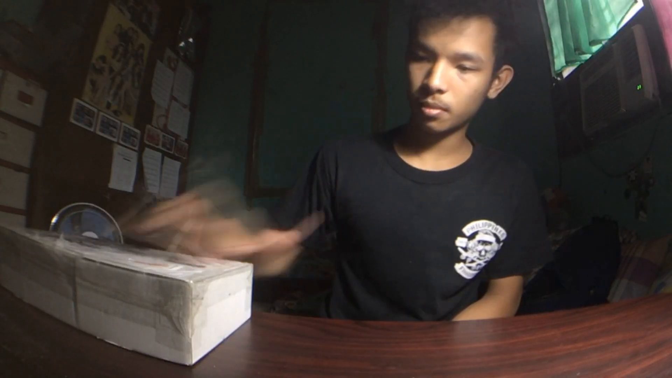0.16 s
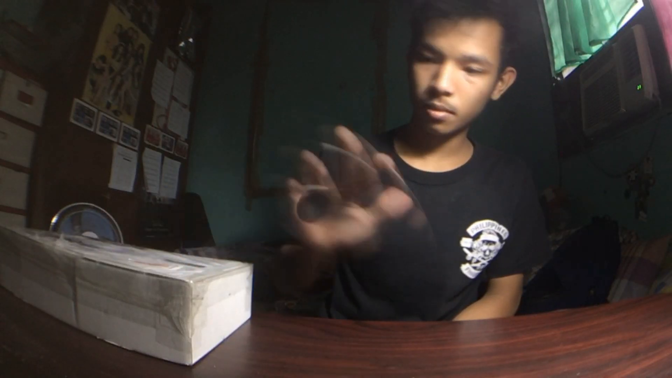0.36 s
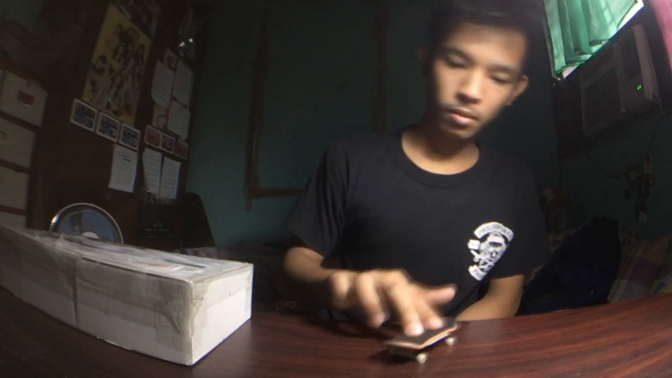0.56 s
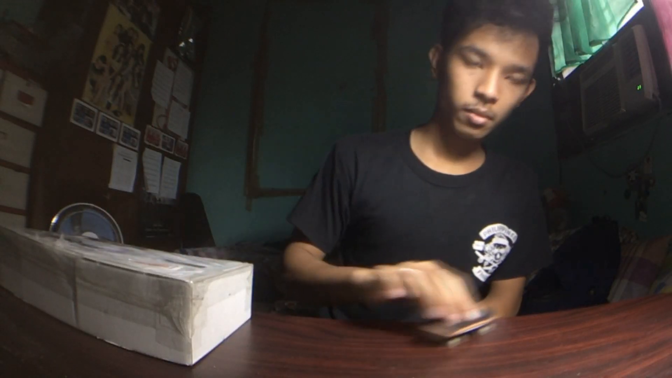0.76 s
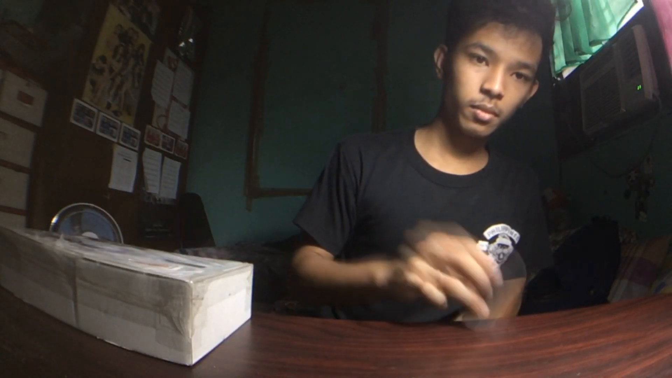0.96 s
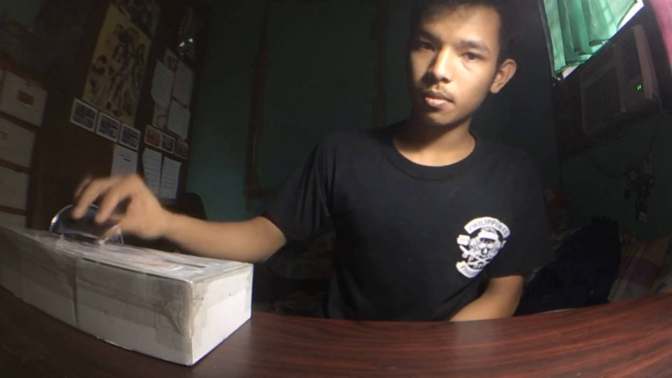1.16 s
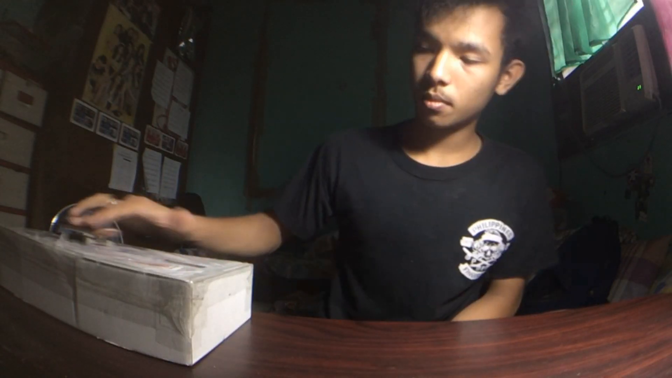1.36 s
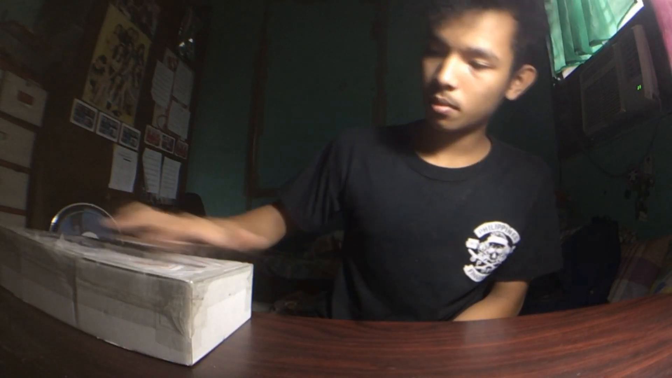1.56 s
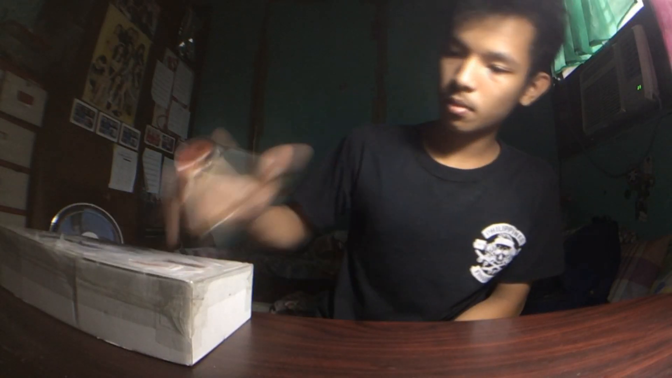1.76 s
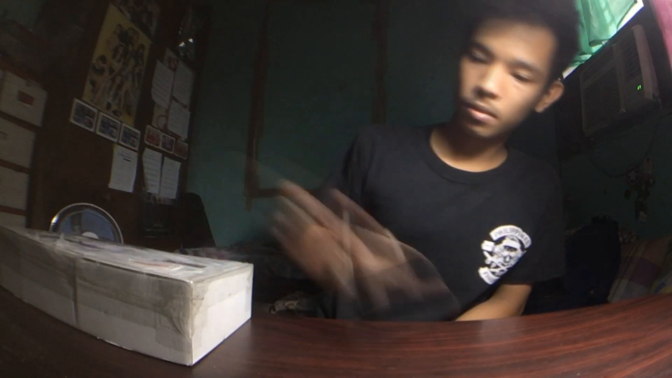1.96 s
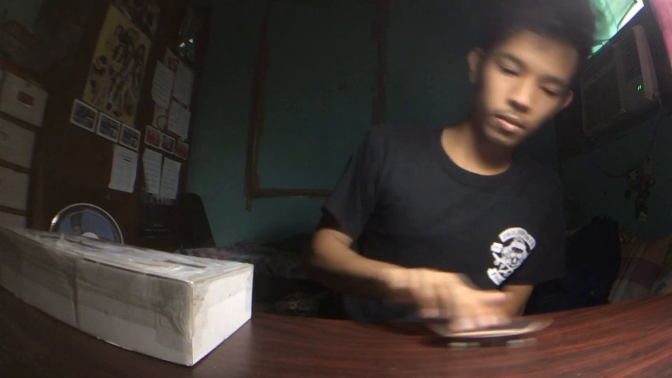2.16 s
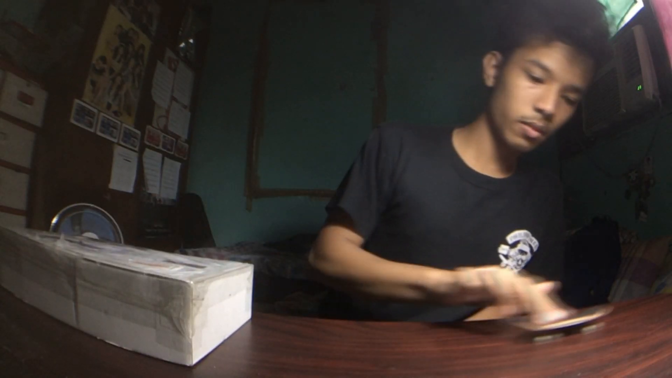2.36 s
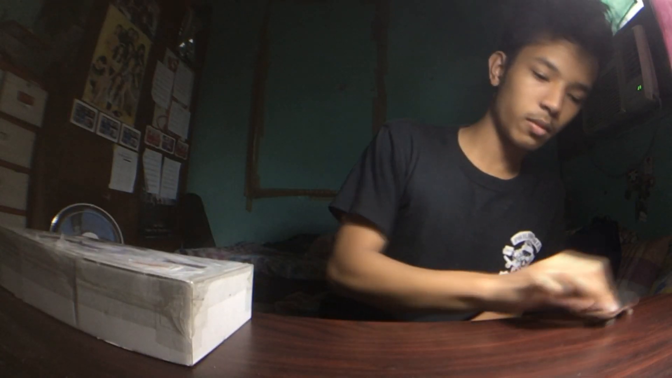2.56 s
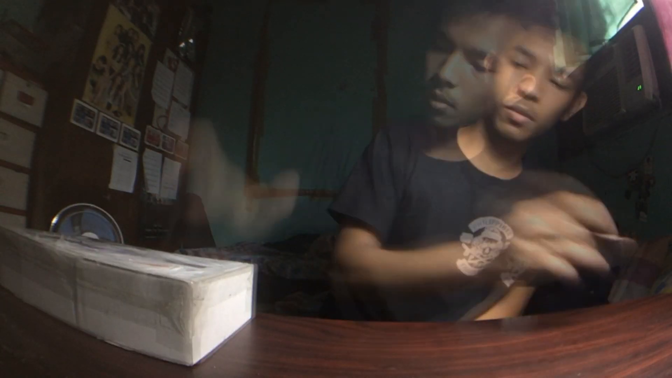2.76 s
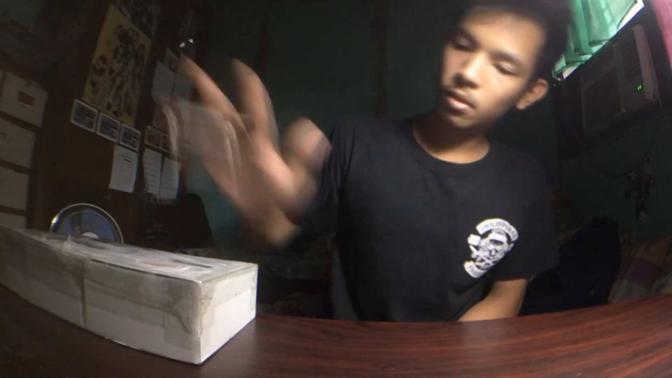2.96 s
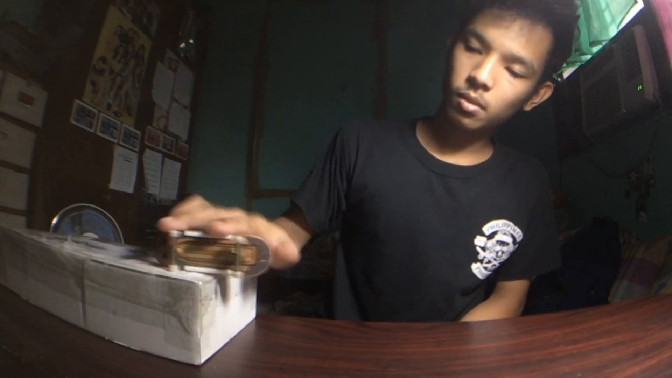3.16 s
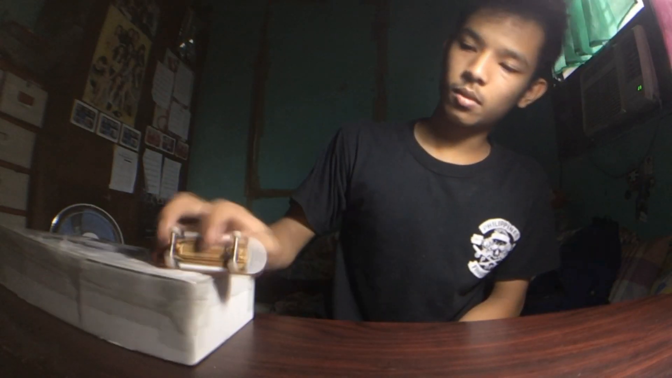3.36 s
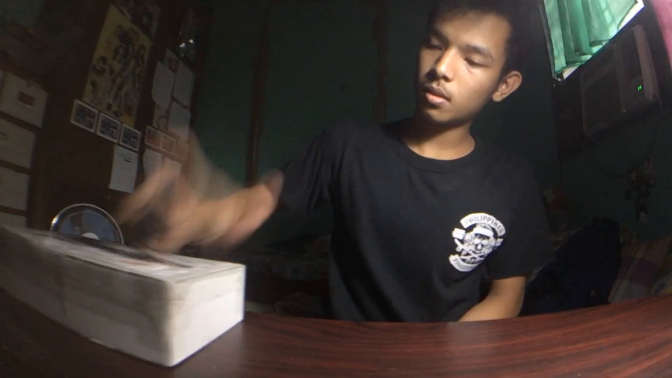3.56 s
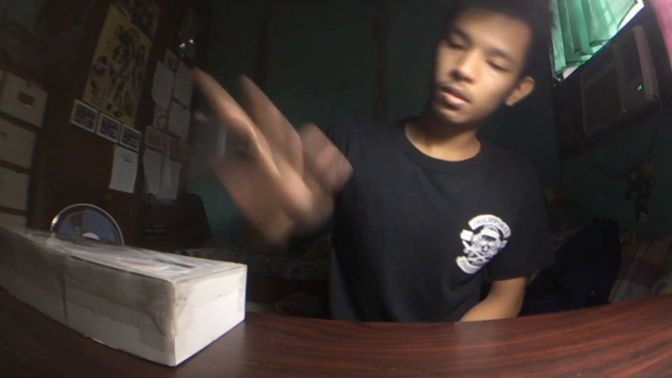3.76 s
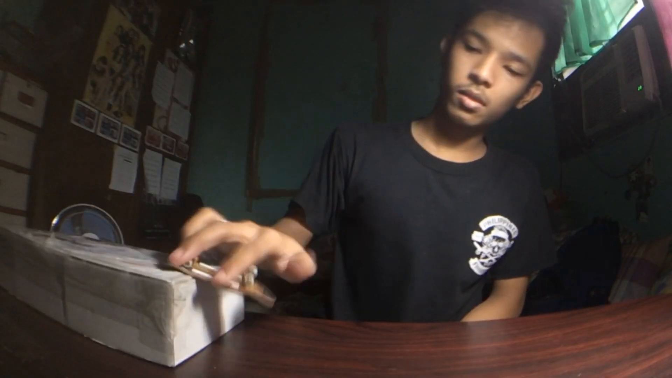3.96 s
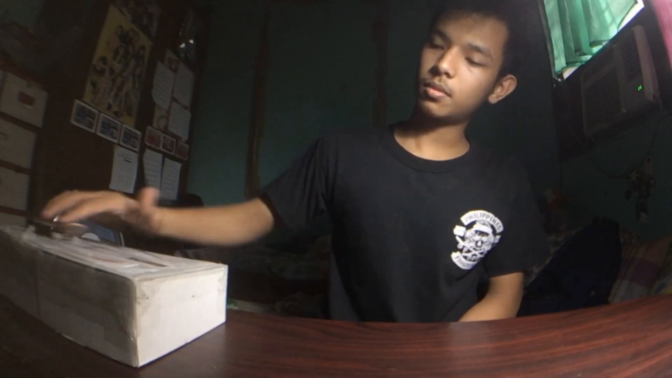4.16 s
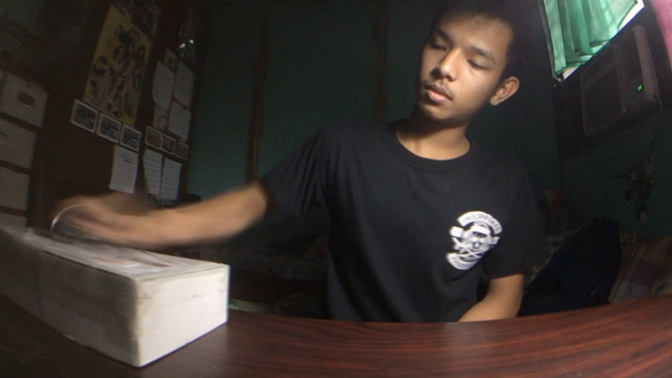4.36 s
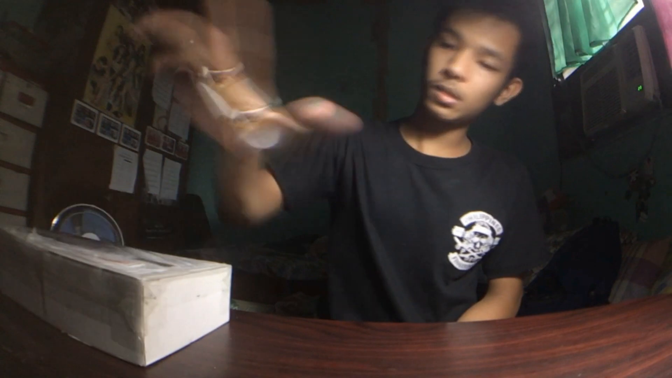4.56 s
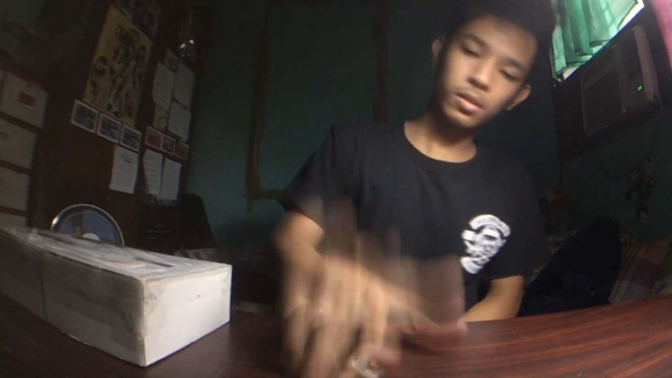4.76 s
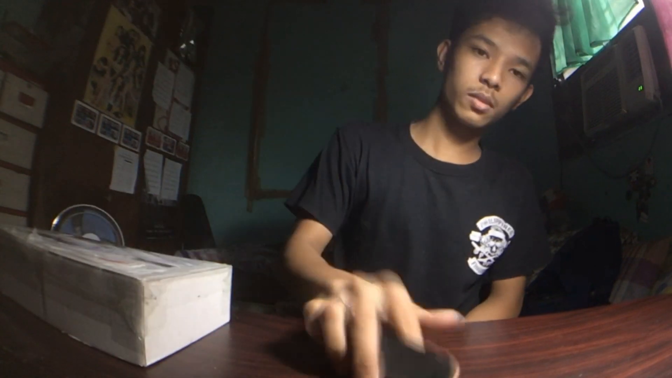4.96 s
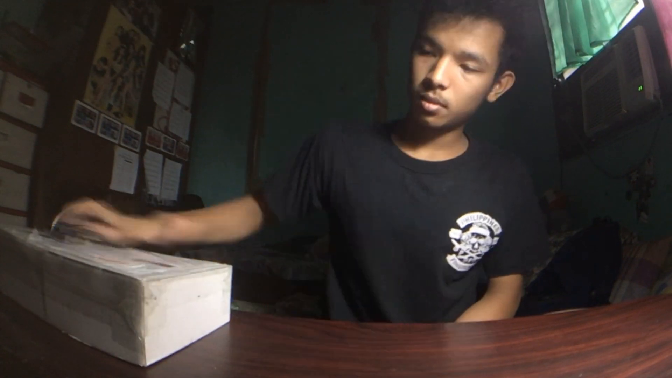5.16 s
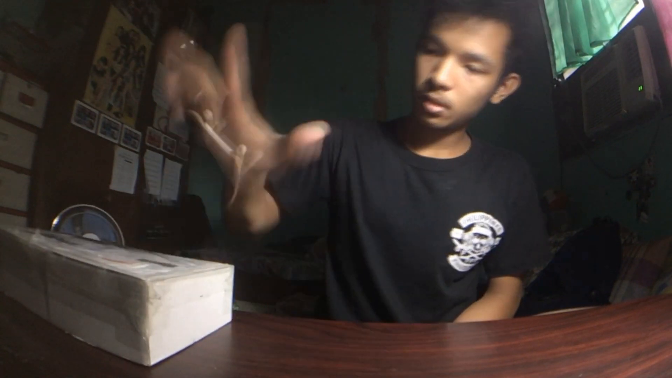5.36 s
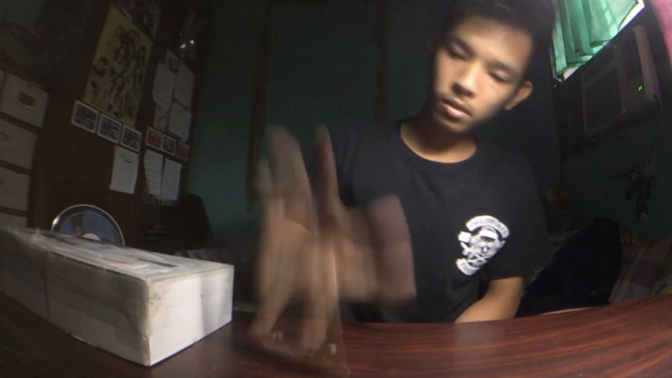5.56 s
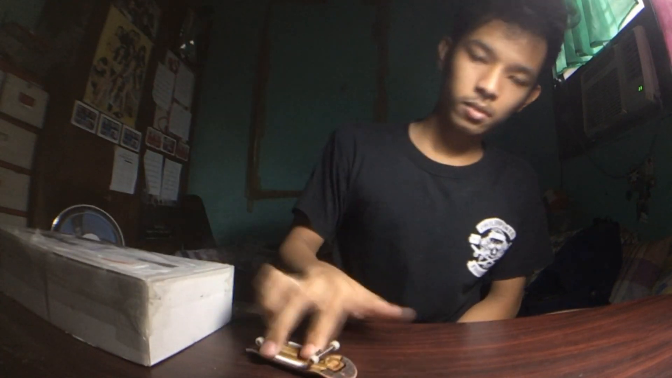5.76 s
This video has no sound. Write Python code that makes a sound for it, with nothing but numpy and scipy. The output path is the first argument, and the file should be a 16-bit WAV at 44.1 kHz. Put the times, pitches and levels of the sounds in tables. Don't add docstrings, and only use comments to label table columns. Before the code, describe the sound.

Indoors and close up, over low unsteady hum, hiss and street rumble, a fingerboard scrapes across a hollow cardboard box at 0.25 s, knocks at 0.3, then hits a wooden desk at 0.58-0.61 in very loud clustered clacks. Light rolling and ticks follow around 0.8-1.0; knocks come at 1.08 and 1.27-1.37. Wheels boom on cardboard at 1.63, a knock sounds at 1.84, and a hard double landing at 2.13-2.16 leads into rumbling wheels with regular axle ticks and a tiny squeak until 2.77. Box knocks cluster at 3.2. A short rising judder at 3.63 precedes box clatter at 3.96-4.09. Another, stronger judder at 4.5 leads to a desk smack at 4.9; the last at 5.33 leads to a clack at 5.73. From 4.24 a distant motorbike drones, dipping near 5.0. Blows clip and briefly duck the background; scene changes cause abrupt level jumps or dips, nearly silent at 3.58.

```python
import sys
import numpy as np
from scipy import signal
from scipy.fft import rfft, irfft, next_fast_len
from scipy.io import wavfile
from scipy.ndimage import uniform_filter1d, map_coordinates

SR = 44100
rng = np.random.default_rng(int(sys.argv[2]) if len(sys.argv) > 2 else 0)


def linear_from_db(decibels):
    return 10 ** (np.asarray(decibels, float) / 20)


def persist_wave(psi):
    counts = np.round(np.clip(psi, -1, 1) * 32767).astype(np.int16)
    wavfile.write(sys.argv[1], SR, np.atleast_2d(counts).T)


N = 255780
T = np.arange(N) / SR

# start_s, click_db, deck_db, thud_db, thud_hz
DESK_BLOWS = [(0.5847, 4.5, -8.5, -10.5, 223), (0.59, -7.5, -1, -5.5, 179), (0.5975, -7, -2.5, -16, 248),
              (0.6092, -8, -15, -8, 253), (0.6128, 4.5, -3.5, -13, 258), (2.1326, -2, 2.5, -3, 240),
              (2.159, 2.5, -7.5, -15.5, 98), (2.1625, -2.5, 1.5, -13.5, 106), (4.9, -3, -6, -7, 353),
              (4.904, -6, 0, -22.5, 128), (4.9075, -1.5, -3, -1, 136), (4.9225, -12.5, -1.5, -24, 119),
              (4.9715, -22, -21, -20, 193), (5.704, -35, -34, -62, 219.5), (5.7256, -2.5, 1.5, -7.5, 190),
              (5.729, -10.5, -7.5, -6, 180)]
# start_s, click_db, deck_db, thud_db, thud_hz
BOX_BLOWS = [(0.3004, -25, -22.5, -15.5, 243), (1.0834, -16.5, -24.5, -30.5, 210),
             (1.2678, -37.5, -20, -26, 216), (1.286, -45, -27, -27.5, 261), (1.3579, -35, -14, -24, 360),
             (1.3682, -32, -19.5, -27.5, 196.6), (1.8422, -17, -14, -9.5, 250),
             (3.1896, -14, -10.5, -9.5, 232), (3.2054, -25, -22, -17.5, 229),
             (3.2185, -29, -10.5, -12, 170), (3.9627, -16.5, -10, -12, 307), (3.9802, -27, -41, -27, 250),
             (4.0199, -22, -49, -46, 285), (4.0295, -23.5, -10.5, -14.5, 385), (4.048, -36, -42, -27, 330),
             (4.0923, -39.5, -50, -53, 133)]
# start_s, deck_hz, loosest_axle_hz, snap_db
HOLDS = [(0, 1210, 2400, -9.5), (.5, 757, 3710, -6), (1, 980, 2250, -8), (1.2, 1125, 1720, -29),
         (1.8, 1126, 2770, -14), (2, 1060, 1860, -21), (2.15, 810, 5870, -15), (3, 1070, 6460, -7.5),
         (3.9, 1110, 1720, -14.5), (4, 1000, 1720, -7.5), (4.8, 1187, 2500, -11), (5.6, 1167, 3030, -24.5)]
# pitch_hz, level_db, t60_s
DESK_MODES = [(71.4, -5.5, .15), (115, 7, 0.1), (208, 6, 0.086), (253, 3, 0.15), (327, -4, 0.13),
              (442, -11.5, 0.12)]
# pitch_hz, level_db, t60_s
BOX_MODES = [(80, -0.5, 0.14), (129, 1, 0.1), (207, 14, 0.033), (265.3, -1.5, 0.097), (325, 2, 0.09),
             (556, -11.5, 0.066)]
# pitch_hz, level_db, t60_s
DECK_MODES = [(660, -8, .03), (960, -5, .03), (1300, -6, .025), (1750, -6, .02)]
# pitch_hz, level_db
AXLE_MODES = [(1750, -13.5), (2700, -7), (3800, -8.5), (6200, -12)]
# pitch_hz, level_db
CONTACT_SPECTRUM = [(800, -40), (1800, 1.5), (2600, 9), (3900, 4), (6200, -3), (9500, -12), (14000, -37.5),
                    (16000, -42)]

# start_s, peak_db, pitch_hz
AXLE_TICKS = [(0.551, -53, 6300), (0.562, -50, 6200), (0.572, -50.5, 6300), (0.802, -55, 2800),
              (0.8774, -50, 2570), (0.9312, -37.5, 6300), (1, -36.5, 2620), (2.296, -38.5, 2500),
              (2.3545, -47, 2520), (2.415, -30.5, 3850), (2.4701, -34.5, 2620), (2.5228, -31, 2600),
              (2.575, -35.5, 2800), (2.63, -39, 3100), (2.6844, -28, 2920), (2.7038, -31.5, 2400),
              (2.7649, -34, 4220), (3.437, -49, 2370)]
# start_s, fastest_s, top_slip_hz, level_db
PUSHES = [
    (.236, 0.268, 411, -26.5),
    (3.616, 3.665, 399, -23),
    (4.476, 4.519, 511, -20),
    (5.308, 5.36, 476, -17),
]
# start_s, hold_s, level_db
BOX_STROKES = [(.2, .02, -49), (.262, 0.023, -23.5), (1.63, 0.081, -30.5), (1.69, 0.05, -33),
               (1.84, 0.0044, -37), (3.5, .05, -54), (3.61, 0.056, -25), (3.645, 0.031, -26),
               (4.27, 0.2, -45.5), (4.47, .02, -29.5), (4.505, 0.019, -19.5), (5.255, 0.03, -36),
               (5.312, 0.036, -25), (5.34, 0.023, -20)]
# start_s, hold_s, rumble_db, hiss_over_rumble_db
DESK_STROKES = [(0.828, 0.02, -33.5, -17), (0.875, 0.033, -39.5, -9), (0.918, 0.053, -38, -11),
                (0.988, 0.077, -44, -10.5), (1.158, 0.034, -55, -24), (2.265, 0.026, -40, -11.5),
                (2.359, 0.024, -39, -13.5), (2.41, 0.19, -34.5, -14.5), (2.618, 0.059, -41, -7),
                (2.686, 0.02, -38, -4), (2.76, .003, -51, -11)]
# pitch_hz, width_hz, level_db
CARDBOARD_BODY = [(250, 103, 5.5), (888, 260, 3), (1142, 151, 5), (1606, 174, -6), (2320, 530, -17.5),
                  (6700, 7300, -43.5)]
# pitch_hz, width_hz, level_db
ROLLING_BODY = [(300, 200, -8), (646, 55, 1), (880, 110, -1), (1250, 200, -4), (1650, 400, -13)]
# pitch_hz, width_hz, level_db
BEARING_BODY = [(2600, 150, 3), (3900, 900, -6), (6100, 600, -9), (8500, 2500, -18)]
# start_s, hold_s, level_db
SQUEAK = [
    (2.345, .065, -62),
]
# start_s, hold_s, level_db
SLEEVE_STROKES = [
    (2.904, .02, -65),
    (3.44, 0.018, -60.5),
    (3.5, 0.064, -67),
    (5.125, .06, -70),
]

# pitch_hz, t60_s
ROOM_DECAY = [(100, 0.13), (500, 0.15), (3000, 0.24), (8000, 0.19), (15000, 0.11)]
# start_s, hum_db, throb_db, street_db
BACKGROUNDS = [(0, -38.5, -43, -41.5), (1.23, -38.5, -43, -41.5), (2.901, -38.5, -41, -41),
               (3.581, -46, -39, -39.5), (4.239, -35, -36.5, -40), (5.232, -37.5, -37.5, -48.5)]
# multiple, level_db
ENGINE_ORDERS = [(2, -16), (3, -7), (4, 4.5), (5, -9), (6, -6.5), (8, -12.5)]
# time_s, level_db
BIKE_NEARNESS = [(4.24, -45), (4.612, -37.5), (4.822, -32.5), (4.99, -62), (5.248, -34), (5.39, -36.5),
                 (5.8, -32)]
# pitch_hz, density_db_per_hz
STREET_SPECTRUM = [(47, -52.5), (80, -8.5), (241, 1), (310, -6), (576, -11), (1500, -25), (1950, -43),
                   (3300, -120)]
# pitch_hz, density_db_per_hz
HISS_SPECTRUM = [(350, -19.5), (600, -6), (1050, -8), (1980, -13), (4400, -22.5), (4910, -24.5),
                 (9800, -40.5), (16000, -62)]
# centre_s, half_width_s, level_db
SCENE_FADES = [(1.229, 0.0053, -8), (2.903, 0.0077, 3), (3.582, 0.018, -66), (4.237, 0.0098, 0.5),
               (5.231, 0.0045, -8.5)]


def unit(x):
    return x / np.sqrt(np.mean(x ** 2) + 1e-20)


def along(points, hz):
    f, v = np.transpose(points)
    return np.interp(np.log(hz + 1), np.log(f + 1), v)


def wobble(rate):
    knots = rng.standard_normal(int(N * rate / SR) + 4)
    return map_coordinates(knots, [T * rate])


def filtered(x, response):
    m = next_fast_len(len(x) + 8192)
    return irfft(rfft(x, m) * response(np.fft.rfftfreq(m, 1 / SR)), m)[:len(x)]


def resonant(body):
    def response(f):
        total = 0
        for k, (hz, width, db) in enumerate(body):
            damping = 1j * f * width
            total = total + (-1) ** k * linear_from_db(db) * damping / (hz * hz - f * f + damping)
        return total
    return response


def swells(rows, rise_db_per_s, fall_db_per_s):
    levels = []
    for s, hold, db in rows:
        rise = rise_db_per_s * np.maximum(s - T, 0)
        fall = fall_db_per_s * np.maximum(T - s - hold, 0)
        levels.append(db - rise - fall)
    return linear_from_db(np.max(levels, axis=0))


def burst(t, t60, hz, sharp):
    puff = linear_from_db(-60 * t / t60) * rng.standard_normal(len(t))
    return np.sqrt(sharp) * signal.lfilter(*signal.iirpeak(hz, sharp, SR), puff)


def ring(modes, t, attack_s, luck):
    total = 0
    for (hz, db, t60), strength, detune in zip(modes, luck, luck[6:]):
        decay = linear_from_db(db + 2.5 * strength - 60 * t / t60)
        total = total + decay * np.sin(2 * np.pi * hz * (1 + .02 * detune) * t)
    return total * (1 - np.exp(-t / attack_s))


def blows(hits, surface, click_t60, deck_t60, thud_t60, after_db, lag):
    out, broad = np.zeros(N + SR), np.zeros(N + SR)
    t, brief = T[:SR // 4], T[:SR // 25]
    late = np.maximum(t - lag, 0)
    for s, click_db, deck_db, thud_db, thud_hz in hits:
        luck, at = rng.standard_normal(36), round(s * SR)
        _, deck_hz, axle_hz, snap_db = max(row for row in HOLDS if row[0] < s)
        contact = linear_from_db(click_db - 2.5 - 60 * brief / click_t60)
        broad[at:][:len(brief)] += contact * rng.standard_normal(len(brief))
        axle = linear_from_db(snap_db) * burst(brief, .006, 9000, sharp=2.1)
        for hz, db in AXLE_MODES + [(axle_hz, -3)]:
            axle = axle + linear_from_db(db) * burst(brief, click_t60, hz, sharp=7.8)
        plank_modes = [(deck_hz, 4, deck_t60)] + DECK_MODES
        plank = ring(plank_modes, np.maximum(t - lag / 4, 0), 0.00091, luck)
        push = ring([(thud_hz, 1.5, thud_t60)], late, 0.0019, 0 * luck)
        spread = linear_from_db(after_db) * ring(surface, late, 0.003, luck[12:])
        out[at:][:len(brief)] += linear_from_db(click_db) * axle
        out[at:][:len(t)] += linear_from_db(deck_db) * plank + linear_from_db(thud_db) * (push + spread)
    return out[:N] + filtered(broad[:N], lambda f: linear_from_db(along(CONTACT_SPECTRUM, f)))


def ticks():
    out, broad, t = np.zeros(N), np.zeros(N), T[:900]
    for s, db, hz in AXLE_TICKS:
        at = round(s * SR)
        out[at:][:len(t)] += linear_from_db(db + 2.5) * burst(t, 0.012, hz, sharp=6.4)
        broad[at:][:len(t)] += linear_from_db(db + 6.5 - 60 * t / 0.015) * rng.standard_normal(len(t))

    def tapped(f):
        bodies = resonant(BEARING_BODY)(f) + linear_from_db(15) * resonant(ROLLING_BODY)(f)
        return bodies / (1 + (f / 9500) ** 4)
    return out + filtered(broad, tapped)


def judder():
    start_hz, ease, sag_hz_per_s = 197.6, 1.15, 2000
    grip_s, coast_s = .013, 0.011
    deaf_hz, deaf_width_hz, deaf_db = 432, 22, -13
    current = np.searchsorted([s - grip_s for s, *_ in PUSHES[1:]], T)
    start, top, top_hz, _ = np.array(PUSHES)[current].T
    to_go = np.clip((top - T) / (top - start), 0, 1)
    rising = top_hz - (top_hz - start_hz) * to_go ** ease
    hz = np.maximum(rising - sag_hz_per_s * np.maximum(T - top, 0), start_hz)
    phase = 2 * np.pi * np.cumsum(hz * (1 + 0.0441 * wobble(150))) / SR
    wave = np.sin(phase) + .16 * np.sin(2 * phase + 1) + .1 * np.sin(3 * phase)
    strokes = [(s + grip_s, fastest + coast_s - s - grip_s, db) for s, fastest, _, db in PUSHES]
    grip = swells(strokes, rise_db_per_s=1308, fall_db_per_s=531)
    deafness = deaf_db * np.exp(-((hz - deaf_hz) / deaf_width_hz) ** 2)
    return grip * linear_from_db(7 + 0.3 * wobble(94) + deafness) * wave


def gritty(body, rough_db, clump, top_hz):
    unevenness = linear_from_db(rough_db * (wobble(430) + clump * wobble(64)))
    grains = rng.standard_normal(N) * unevenness
    return unit(filtered(grains, lambda f: resonant(body)(f) / np.sqrt(1 + (f / top_hz) ** 6)))


def wheels():
    slide = swells(BOX_STROKES, 520, 650) * gritty(CARDBOARD_BODY, rough_db=1.5, clump=1.0, top_hz=10700)
    rumble = gritty(ROLLING_BODY, rough_db=2.5, clump=.35, top_hz=1900)
    hiss = gritty(BEARING_BODY, rough_db=2.0, clump=0.25, top_hz=9100)
    roll = swells([row[:3] for row in DESK_STROKES], 330, 400) * rumble
    hiss_strokes = [(s, hold, db + over_db) for s, hold, db, over_db in DESK_STROKES]
    roll = roll + swells(hiss_strokes, 400, 420) * hiss
    sleeve = gritty([(8470, 8000, 0)], rough_db=3, clump=.4, top_hz=15000)
    rustle = swells(SLEEVE_STROKES, 700, 400) * sleeve
    squeak_hz = 7960 - 1500 * (T - SQUEAK[0][0])
    tone = linear_from_db(4.3 * wobble(68)) * np.sin(2 * np.pi * np.cumsum(squeak_hz + 60 * wobble(200)) / SR)
    return slide + roll + rustle + swells(SQUEAK, 430, 300) * tone


def room(x):
    hz, t, z = signal.stft(np.pad(x, (260, 0))[:N], SR, nperseg=256)
    keep = linear_from_db(-120 * (t[1] - t[0]) / along(ROOM_DECAY, hz))
    power = np.abs(z) ** 2
    blurred = uniform_filter1d(power, size=9, axis=0)
    energy = np.where(hz[:, None] < 1500, power, blurred)
    stored = np.array([signal.lfilter([1 - k], [1, -k], e) for k, e in zip(keep, energy)])
    noise = signal.stft(rng.standard_normal(N), SR, nperseg=256)[2]
    answer = np.sqrt(np.abs(stored)) * noise / np.abs(noise).mean()
    return signal.istft(answer, SR, nperseg=256)[1][:N]


def motorbike(near, since):
    hz = 68.7 - 7.5 * since
    phase = 2 * np.pi * np.cumsum(hz * (1 + .005 * wobble(20))) / SR
    orders = sum(linear_from_db(db + 0.86 * wobble(18.0)) * np.sin(k * phase) for k, db in ENGINE_ORDERS)
    return near * linear_from_db(-10 + 6.5 * since) * orders


def background():
    starts, *levels = np.transpose(BACKGROUNDS)
    current = np.searchsorted(starts[1:], T)
    hum_db, throb_db, street_db = (db[current] for db in levels)
    hum_phase = 2 * np.pi * np.cumsum(58 + 1.8 * wobble(12)) / SR
    hum = linear_from_db(hum_db + 6.0 + 1.5 * wobble(6.2)) * np.sin(hum_phase)
    since = np.maximum(T - 4.24, 0)
    near = (since > 0) * linear_from_db(np.interp(T, *np.transpose(BIKE_NEARNESS)))
    bike = motorbike(near, since)
    air = unit(filtered(rng.standard_normal(N), lambda f: linear_from_db(along(STREET_SPECTRUM, f))))
    hiss = unit(filtered(rng.standard_normal(N), lambda f: linear_from_db(along(HISS_SPECTRUM, f))))
    throb = unit(filtered(rng.standard_normal(N), resonant([(54.5, 11, 0)])))
    gusts = linear_from_db(1.2 * wobble(7))
    street = (linear_from_db(street_db) + linear_from_db(-6) * near) * gusts * air
    return hum + bike + street + linear_from_db(-50.5) * hiss + linear_from_db(throb_db) * throb


def scene():
    desk = blows(DESK_BLOWS, DESK_MODES, click_t60=0.014, deck_t60=0.012, thud_t60=0.038, after_db=-8.5, lag=.003)
    box = blows(BOX_BLOWS, BOX_MODES, click_t60=0.013, deck_t60=0.021, thud_t60=0.032, after_db=-2, lag=0.00358)
    moving = ticks() + judder() + wheels()
    wet = linear_from_db(-10.5) * room(desk + linear_from_db(-2.0) * box + linear_from_db(-6.5) * moving)
    return (desk + box + moving + wet + background())[None]


def top_cut(x):
    return signal.sosfilt(signal.butter(12, 16830, fs=SR, output="sos"), x)


def record(dry):
    def microphone(f):
        return (1j * f / (48 + 1j * f)) ** 2 / np.sqrt(1 + (f / 15800) ** 60)
    heard = filtered(dry[0], microphone)[None]
    memory = .12 * SR
    power = signal.lfilter([1 / memory], [1, 1 / memory - 1], heard ** 2)
    ducked = heard / (1 + power / linear_from_db(-27.5)) ** 0.12
    clipped = .85 * ducked / (1 + np.abs(ducked) ** 8) ** (1 / 8)
    fade_db = 0
    for s, half, db in SCENE_FADES:
        fade_db = fade_db + db * np.clip(1.5 - 1.2 * (np.abs(T - s) / half) ** 2, 0, 1)
    return top_cut(clipped * linear_from_db(fade_db))


dry = scene()
out = record(dry)
persist_wave(out)
```